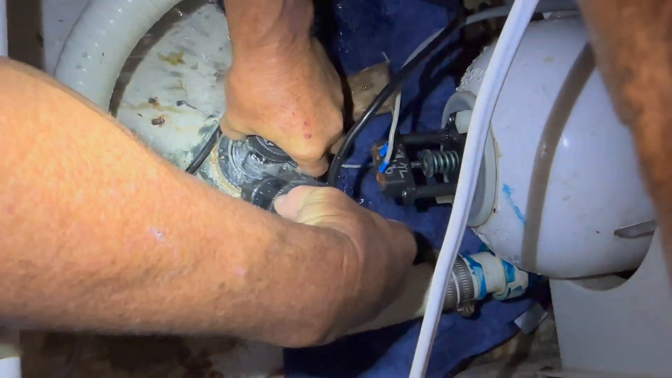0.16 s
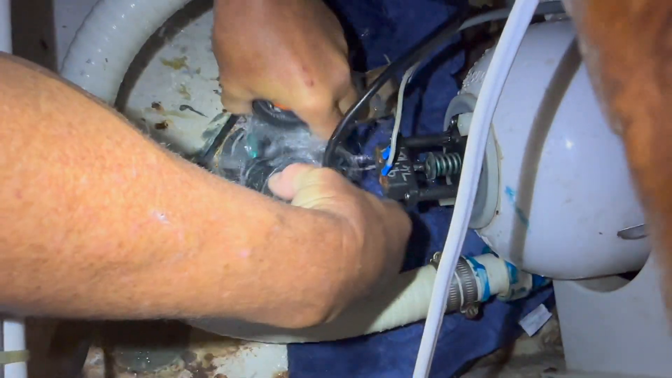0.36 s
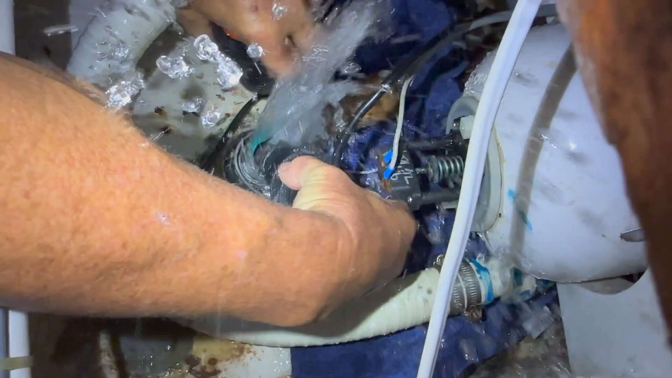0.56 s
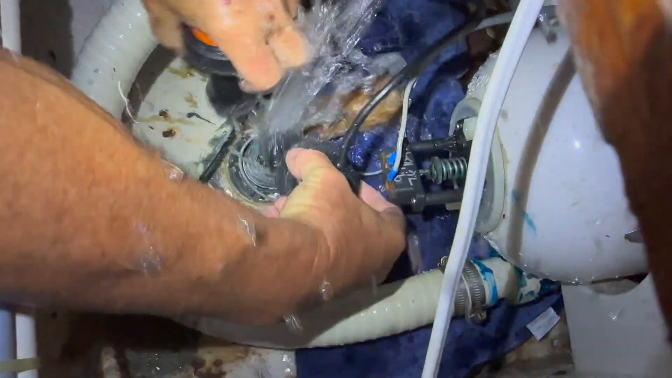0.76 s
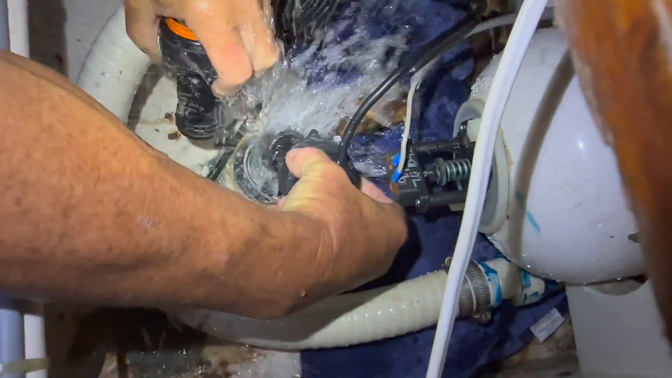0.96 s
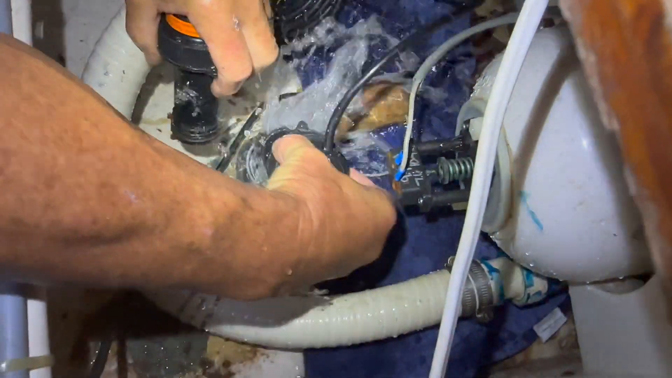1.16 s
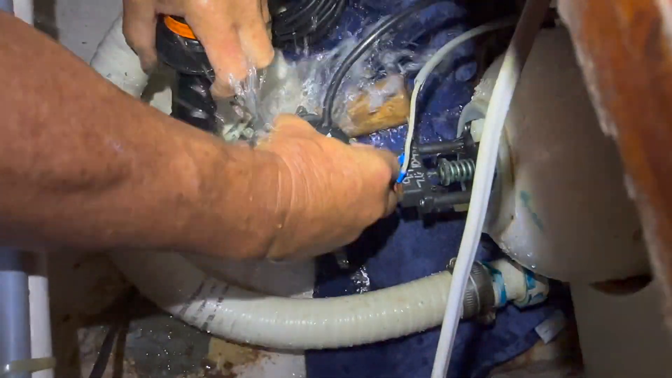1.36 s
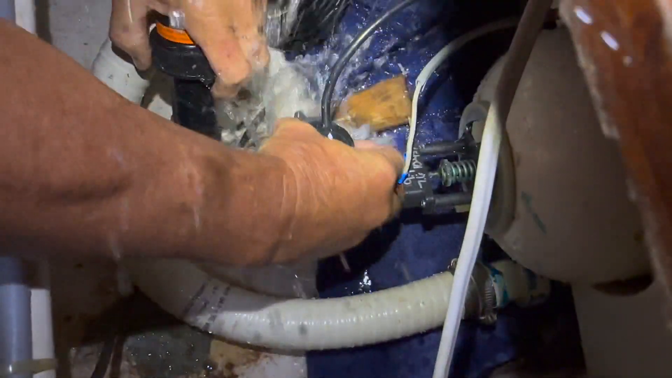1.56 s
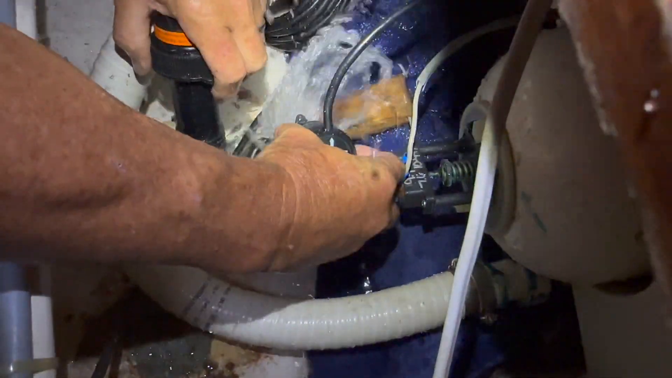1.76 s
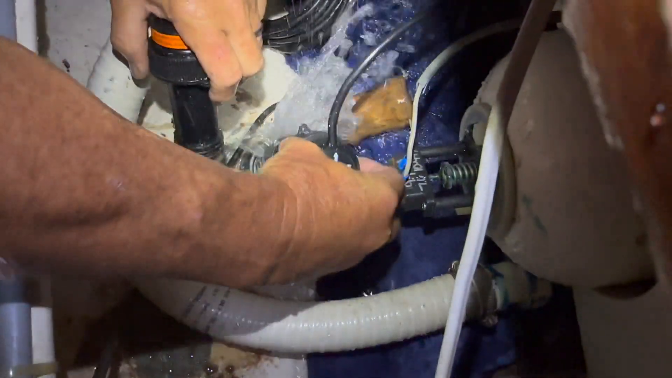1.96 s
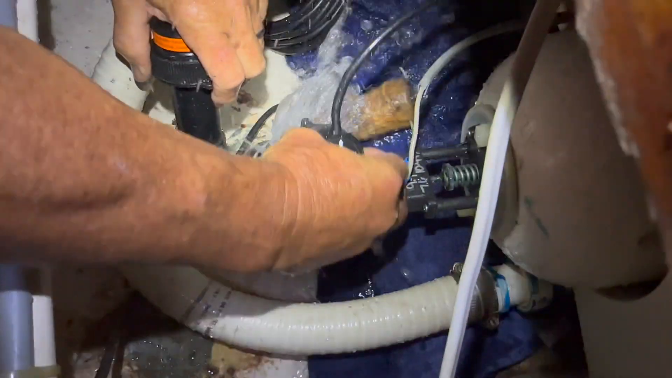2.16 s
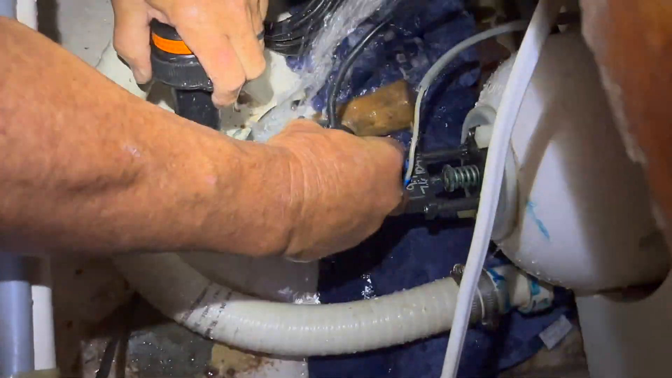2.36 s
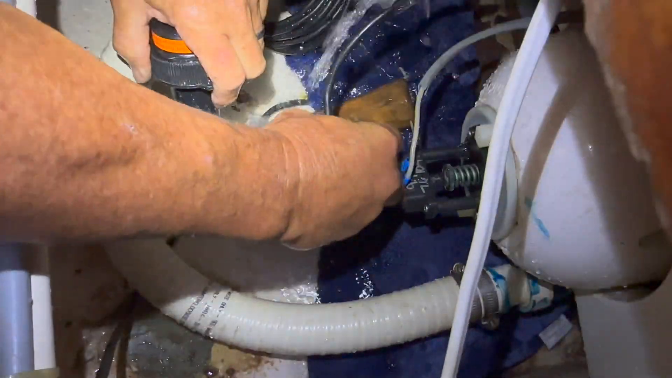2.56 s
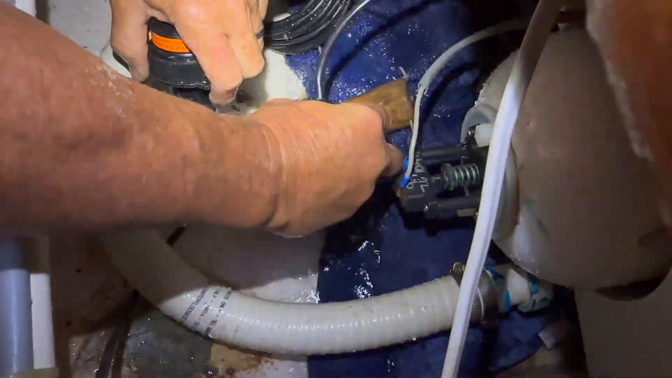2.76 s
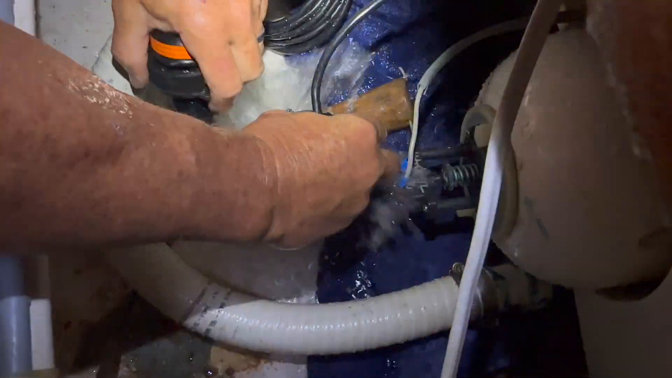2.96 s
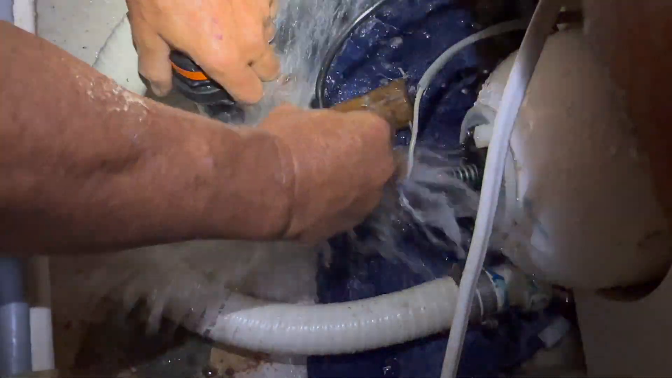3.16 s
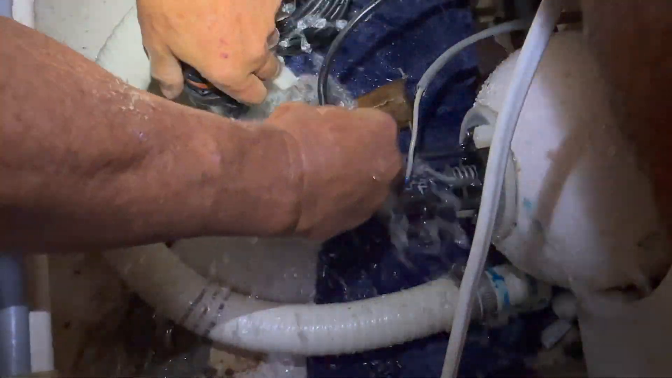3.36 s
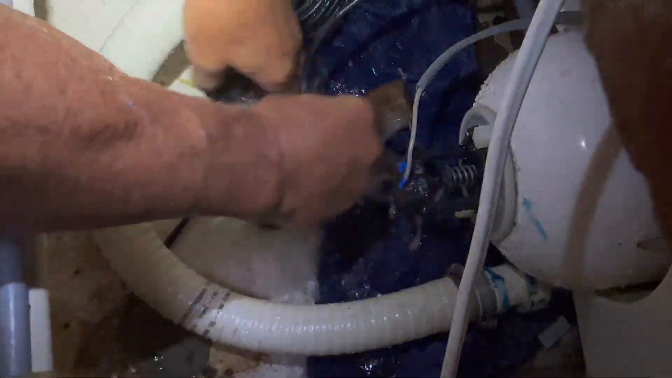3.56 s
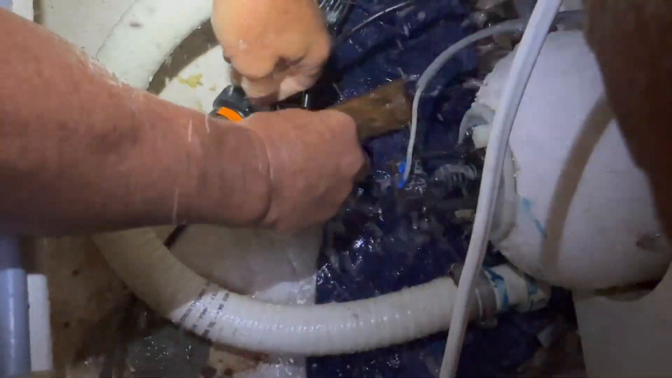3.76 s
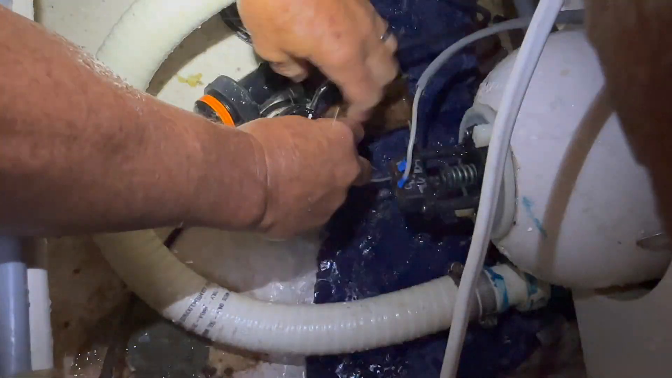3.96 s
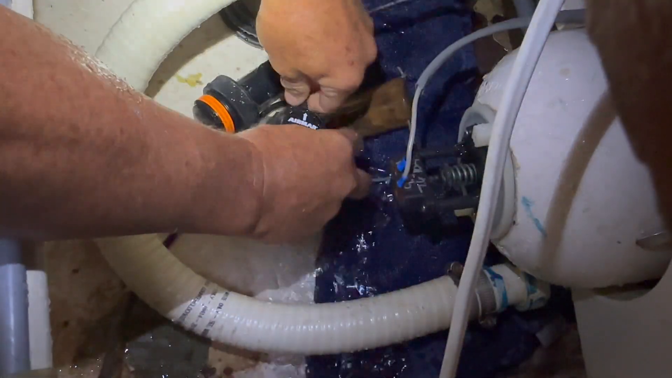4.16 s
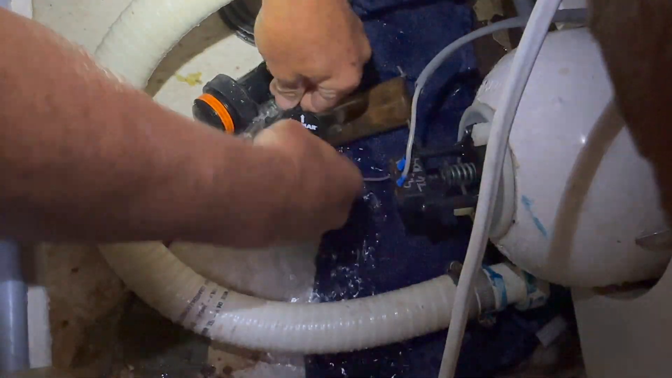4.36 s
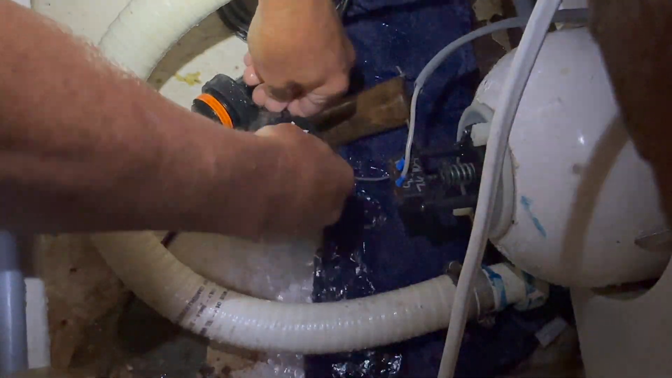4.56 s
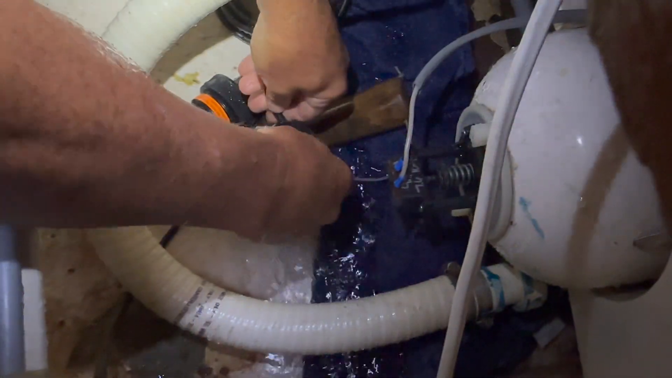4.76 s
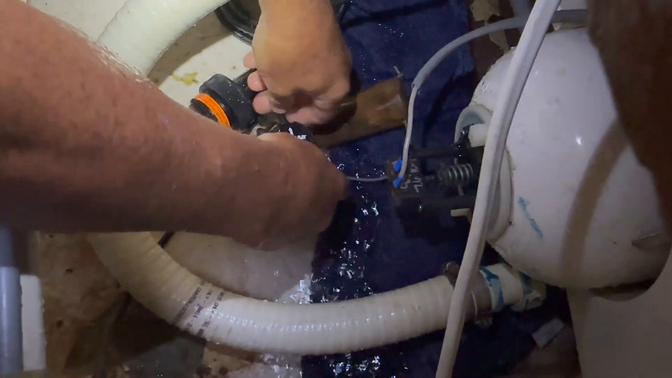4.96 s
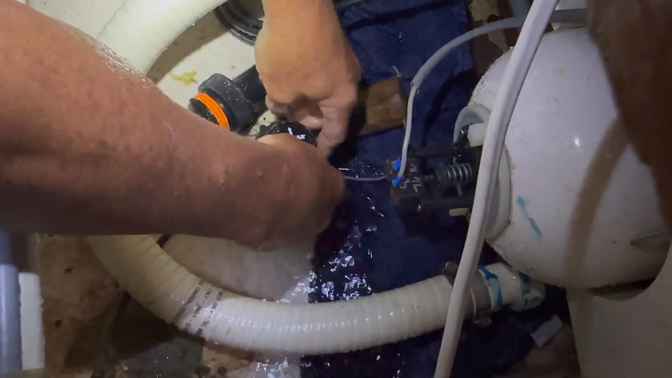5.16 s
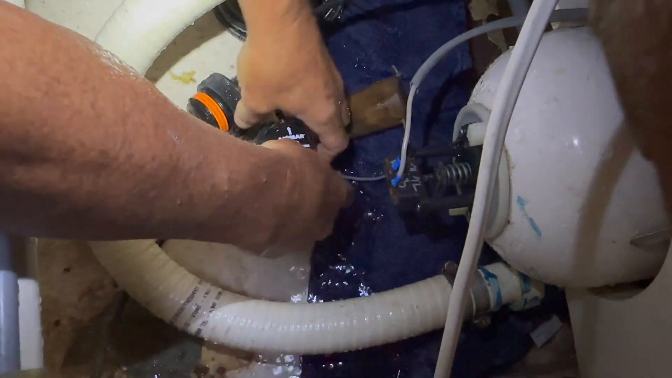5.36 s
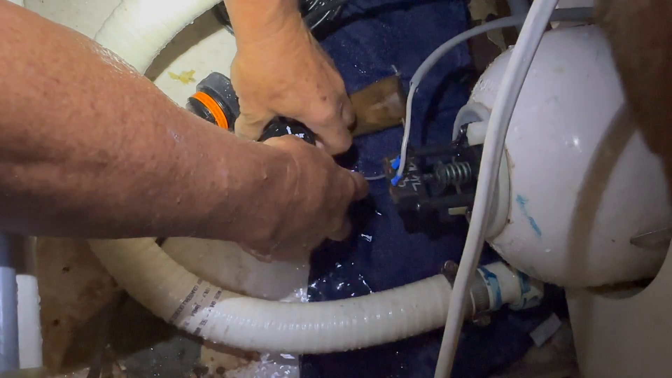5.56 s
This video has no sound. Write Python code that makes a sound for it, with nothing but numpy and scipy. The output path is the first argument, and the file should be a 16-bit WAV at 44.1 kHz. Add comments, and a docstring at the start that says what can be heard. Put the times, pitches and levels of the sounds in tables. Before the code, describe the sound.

A cramped, hard boat bilge, very close and wide in stereo, with short reflections. Seawater is already hissing as hands knock the fitting in a dull cluster at 0.1-0.2 s. Sloshing swells at 0.3, then the loudest event, a sharp double knock, watery slap and deep hull boom near 100 Hz, lands around 0.4. Bright spray gushes on, fizzing and bubbling, with a faint breathy whistle of the jet near 0.6-1.4, drop ticks, soft rubs and low bumps; clearer knocks come at 1.1, 2.2 and 2.5. Spray swells near 3.1. From 3.5 to 3.9 a hollow cap catches and grates, ringing briefly, with surges of splash at 3.55 and 3.7. From 4.0 the leak gurgles in uneven bubbly bursts. A rounded thump falls at 4.6, spray drops away by 4.8, another soft thump and gurgle come near 4.95, then faint trickling and isolated bubbles to about 5.6.

```python
"""In a boat's bilge, close to two microphone ports, seawater gushes through an open hull fitting from the start.
It sprays, sloshes and bubbles while hands knock and rub the fitting and the hull booms near 100 Hz.
From 3.5 s a hollow blanking cap grates into the fitting; from 4 s the leak gurgles under it, and by 4.8 s
the spray is faint. Water is noise and rising damped sines; solid parts are resonances struck or rubbed.
The ports hear the bass alike and the treble in opposite phase."""
import sys
import numpy as np
from scipy import signal
from scipy.fft import rfft, irfft, next_fast_len
from scipy.io import wavfile
from scipy.ndimage import uniform_filter1d

SR = 44100
rng = np.random.default_rng(int(sys.argv[2]) if len(sys.argv) > 2 else 0)


def transcribe(u):
    """Save the signal u as a 16-bit wav file named by the first command-line argument.

    u: samples, shape (n,) or (channels, n), limited to [-1, 1]; the rate is SR.
    q: integer samples, one column per channel.
    """
    v = np.clip(np.atleast_2d(u).T, -1, 1)
    q = np.round(v * 32767).astype(np.int16)
    wavfile.write(sys.argv[1], SR, q)


N = 247842  # samples

# Table levels are relative: each function adds its own trim in dB.


def amp(db):
    """Amplitude ratio of a level in dB."""
    return 10 ** (np.asarray(db) / 20)


def unit(x):
    """Scale to an RMS of one."""
    return x / np.sqrt(np.mean(x ** 2) + 1e-20)


def along(points, hz):
    """Read a curve of (frequency_hz, value) points on a log frequency axis."""
    point_hz, values = np.transpose(points)
    return np.interp(np.log(hz + 1), np.log(point_hz + 1), values)


def curves(rows):
    """One value per sample for each column after the time; -120 dB outside the table."""
    s, *columns = np.transpose(rows)
    return [np.interp(np.arange(N) / SR, s, column, -120, -120) for column in columns]


def milliseconds():
    """Clock in seconds for slow controls, one tick a millisecond."""
    return np.arange(0, N / SR + .001, .001)


def sampled(control):
    """A slow control interpolated to one value per sample."""
    return np.interp(np.arange(N) / SR, milliseconds(), control)


def swells(s, db, rise_s, t60):
    """Slow gain of each event, one a row, climbing then decaying in dB; also the time since each peak."""
    late = milliseconds() - np.c_[s]
    climb = -late / np.maximum(rise_s, .01)  # rise_s and t60 are each the time for 60 dB
    decay = late / np.maximum(np.c_[t60], .01)
    return amp(np.c_[db] - 60 * np.maximum(climb, decay)), late


def filtered(x, response):
    """Multiply the spectrum by a complex response of frequency."""
    m = next_fast_len(N + SR // 2)
    return irfft(rfft(x, m) * response(np.fft.rfftfreq(m, 1 / SR)), m)[..., :N]


def coloured(x, spectrum):
    """Shape the spectrum by a dB curve, then scale to an RMS of one."""
    return unit(filtered(x, lambda hz: amp(along(spectrum, hz))))


def resonant(x, modes):
    """Pass through parallel causal resonances of alternating sign."""
    def response(f):
        total = 0
        for k, (centre, width, db) in enumerate(modes):
            band = 1j * f * width
            total = total + (-1) ** k * amp(db) * band / (centre * centre - f * f + band)
        return total
    return filtered(x, response)


def near(hz, centre_hz, spread):
    """Weight of a mode by its distance in log pitch from where the part is excited."""
    return np.exp(-.5 * (np.log(hz / np.maximum(centre_hz, 1)) / spread) ** 2)


def patchy(depth_db):
    """Noise with patches of random gain in time and frequency."""
    z = signal.stft(rng.standard_normal(N), nperseg=256)[2]
    field = uniform_filter1d(rng.standard_normal(z.shape), 5, 0)
    field = uniform_filter1d(field, 6, 1)
    return signal.istft(z * amp(depth_db * unit(field)), nperseg=256)[1][:N]


def droplets(count, centre_hz, spread, cycles, size_db):
    """Random short bubbles, each a damped sine whose pitch rises."""
    draw = rng.random((count, 2))
    hz = np.clip(centre_hz * np.exp(spread * rng.standard_normal((count, 1))), 300, SR / 3)
    step = np.arange(350)
    turns = hz * step / SR
    # positive size_db: a few stand out loud; negative: a few are much fainter
    size = amp(-size_db * np.log(np.maximum(draw[:, 1:], .02)))
    fade = np.exp(-turns / cycles) * (1 - np.exp(-turns))
    wave = size * fade * np.sin(2 * np.pi * turns * (1 + 0.048 * turns / cycles))
    where = (draw[:, :1] * N).astype(int) + step
    return unit(np.bincount(where.ravel(), wave.ravel(), N + len(step))[:N])


# Decay of the enclosed space: frequency_hz [Hz], t60_s [s]
BILGE_DECAY = [(200, 0.23), (2000, 0.12), (10000, 0.2)]


def bilge(x):
    """The small hard bilge answers with two noise tails, each frequency dying at its own speed."""
    hz, t, z = signal.stft(rng.standard_normal((2, SR // 3)), SR, nperseg=256)
    fade = amp(-60 * t / along(BILGE_DECAY, hz)[:, None])
    tail = signal.istft(z * fade, SR, nperseg=256)[1]
    return signal.fftconvolve(x[None], tail / np.linalg.norm(tail[0]), axes=1)[:, :N]


# Sea against the hull: frequency_hz [Hz], level_db [dB per Hz]
RUMBLE_SPECTRUM = [(12, -48), (35, -3.5), (103, 0.5), (167, -16), (282, -11), (359, -4.5), (600, -13),
                   (780, -7.5), (1320, -120)]
RUMBLE_DB = -54.5


def rumble():
    """The sea against the hull is steady noise weighted to the bass."""
    return amp(RUMBLE_DB) * coloured(rng.standard_normal(N), RUMBLE_SPECTRUM)


# Weight landing on the hull panel: peak_s [s], level_db [dB], pitch_hz [Hz],
# rise_s [s to climb 60 dB], t60_s [s]; rise and decay times have a 0.01 s floor
THUMPS = [(0.188, -22, 98.45, 0.83, 0.031), (0.302, -19.5, 100.1, 0.14, 1), (0.416, -8, 116, .03, 0.5),
          (0.46, -11.5, 105.5, 0.24, 0.076), (0.528, -31, 93.5, 0.3, 0.18), (0.58, -15, 99, 0.18, 0.051),
          (0.62, -32, 123, -0.65, 0.18), (0.72, -29, 93.7, 0.67, 0.52), (0.85, -41, 104.8, 0.15, 1),
          (1.0, -42, 106.1, 0.53, 0.41), (1.111, -29, 116.9, 0.47, 0.48), (1.283, -26.5, 98.3, -0.33, 0.37),
          (1.528, -32, 111, -0.25, 0.19), (1.66, -44.5, 92.9, 1.5, 0.43), (1.881, -44, 110.8, 0.56, 0.19),
          (1.989, -41, 110.7, 0.32, 0.069), (2.214, -25, 99, -0.08, 0.88), (2.3, -28.5, 91.4, -0.3, 0.34),
          (2.53, -25.5, 96.2, -1.56, 0.38), (2.789, -32.5, 120.2, 0.18, 0.22), (2.92, -53, 100.9, 0.54, 1),
          (3.13, -50.5, 113.2, 0, 0.69), (3.3, -45, 95.9, 0.5, 0.78), (3.373, -23.5, 114.9, 0.25, 0.24),
          (3.419, -29.5, 100, 0.47, 0.42), (3.551, -37, 118.7, -0.26, 0.46),
          (3.603, -15.5, 119.3, 0.11, 0.47), (3.655, -34, 107, 1, 0.2), (3.74, -27, 99.5, 0.04, 0.15),
          (3.929, -26.5, 123.3, 0.36, 0.32), (4.518, -25, 97.8, -0.08, 0.93),
          (4.618, -15, 114.7, -0.67, 0.26), (4.661, -33.5, 107.3, 0.44, 0.18), (4.839, -41.5, 114, 2, 0.2),
          (4.942, -22.5, 121.6, -0.46, 0.62), (5.249, -37.5, 108, -0.26, 0.7)]
# Hull panel resonances: centre_hz [Hz], width_hz [Hz], level_db [dB]
PANEL_MODES = [(67.2, 28, -8), (92.4, 44, -5), (123.75, 5.2, 2.5), (156, 127, -26)]
REST_HZ, SETTLE_S, MURMUR_DB = 89.5, 0.08, -16  # murmur level against the spray curve


def hull():
    """Thumps raise the loaded panel's pitch by their gain-weighted mean; it settles as its modes murmur."""
    s, db, hz, rise_s, t60 = np.transpose(THUMPS)
    gain, late = swells(s, db, np.c_[rise_s], t60)
    boom = sampled(gain.sum(axis=0)) + amp(curves(FLOW)[0] + MURMUR_DB)
    raised_hz = np.c_[hz - REST_HZ] * np.exp(-np.maximum(late, 0) / SETTLE_S)
    lift_hz = sampled((gain * raised_hz).sum(axis=0)) / boom
    # water loading unsettles the pitch
    shake_hz = 3 * unit(uniform_filter1d(rng.standard_normal(N), size=900))
    turns = 2 * np.pi * np.cumsum(REST_HZ + shake_hz + lift_hz) / SR
    # the panel swings unevenly, which adds the octave
    tone = np.sqrt(2) * (np.sin(turns) + amp(-13) * np.cos(2 * turns))
    murmur = unit(resonant(rng.standard_normal(N), PANEL_MODES))
    return boom * (0.35 * tone + 0.32 * murmur)


# Hands sliding on the fitting: peak_s [s], level_db [dB], centre_hz [Hz]
STROKES = [(0.141, -24.5, 429), (0.31, -39, 196), (0.38, -71, 325), (0.414, -20.5, 344), (0.45, -30.5, 183),
           (0.61, -29, 230), (0.868, -35, 280), (1.05, -45, 203.5), (1.25, -39.5, 294), (1.31, -43.5, 180),
           (1.532, -38, 181), (1.618, -37, 229), (2.236, -35.5, 229.7), (2.3, -34, 251), (2.37, -48, 184),
           (2.53, -41, 310), (2.943, -52, 294.5), (3.371, -45, 181.8), (3.47, -43.5, 500),
           (3.54, -29.5, 272), (3.58, -30, 403), (3.66, -34, 176), (3.707, -33.5, 384), (3.9, -32.5, 271),
           (3.938, -49, 354), (4.52, -41, 247), (4.57, -54, 220), (4.626, -24, 204.7), (4.95, -43.5, 249.1),
           (5.199, -53.5, 200)]
# Fitting and bilge floor resonances: centre_hz [Hz], width_hz [Hz], level_db [dB]
BODY_MODES = [(181, 29, 4), (224, 39, 2), (280, 28, -2.5), (347.6, 31, 3.5), (472.5, 49, 1.5),
              (575, 39, -4), (687, 71, -2.5), (895, 200, -1)]
STROKE_RISE_S, STROKE_T60_S = 0.24, 0.11  # each for 60 dB
GRIP_DB, GRIP_HZ = -20, 270  # the held fitting shakes with the spray


def rubs():
    """Hands sliding on the fitting drive its modes near the pitch of the contact."""
    s, db, centre_hz = np.transpose(STROKES)
    gain = swells(s, db, STROKE_RISE_S, STROKE_T60_S)[0]
    grip = amp(curves(FLOW)[0] + GRIP_DB)
    rub = amp(20.5) * patchy(depth_db=4.5)
    out = np.zeros(N)
    for mode in BODY_MODES:
        hz = mode[0]
        drive = sampled(near(hz, centre_hz, 0.58) @ gain) + near(hz, GRIP_HZ, 0.31) * grip
        soft = resonant(rub * drive, [(hz, .8 * hz, 0)])  # a soft contact holds little treble
        out += resonant(soft, [mode])
    return out


# Blows on the fitting: start_s [s], body_level_db [dB], body_centre_hz [Hz],
# hand_damping_t60_s [s], crack_level_db [dB], crack_t60_s [s]
KNOCKS = [(0.106, -0.5, 520, 0.052, -55, 0.033), (0.117, -4.5, 524, 0.034, -33, 0.028),
          (0.127, -19, 470, 0.062, -40, 0.04), (0.141, -23, 393, 0.081, -35, 0.21),
          (0.166, -10, 250, 0.061, -50, 0.034), (0.182, -13.5, 424, 0.032, -32, 0.026),
          (0.319, -18.5, 423, .08, -37, .04), (0.376, -24, 400, 0.054, -22.5, 0.04),
          (0.394, 0, 730, 0.069, -10.5, 0.025), (0.397, -5.5, 486, 0.089, -7, 0.016),
          (0.41, -12, 209, 0.33, -38, 0.042), (0.498, -28, 340, .3, -43, 0.021),
          (0.563, -23, 624, .3, -31, 0.094), (0.581, -32, 350, .3, -31, 0.023),
          (0.599, -24, 310, .3, -27.5, 0.061), (0.612, -28, 190, .3, -32, 0.035),
          (0.635, -30.5, 503, .3, -39, 0.064), (0.836, -18.5, 281, 0.64, -29, 0.059),
          (1.097, -23.5, 425, .3, -27.5, 0.053), (1.117, -22.5, 331, 0.25, -49, 0.028),
          (1.141, -24, 240.3, 0.27, -36, 0.031), (1.265, -21.5, 395, 0.27, -40, 0.045),
          (1.282, -23, 182.4, 0.36, -45, 0.04), (1.503, -39, 353, .3, -29, 0.073),
          (1.581, -22, 283, 0.27, -33.5, 0.13), (2.092, -37.5, 274, .3, -34, 0.028),
          (2.203, -9.5, 307.4, 0.084, -31, 0.17), (2.213, -14, 335.5, 0.19, -30, 0.095),
          (2.222, -24, 230.4, 0.27, -49, .05), (2.506, -23, 335.2, 0.18, -26, 0.083),
          (2.524, -22, 297.3, 0.16, -53, 0.05), (3.322, -28.5, 342.9, .3, -29.5, 0.19),
          (3.486, -20.5, 477.8, .2, -11, 0.047), (3.508, -20, 190.5, 0.17, -26.5, 0.077),
          (3.582, -26, 384, .3, -18.5, 0.027), (3.672, -38, 180.7, .3, -16, 0.05),
          (3.714, -22, 590, .2, -26.5, 0.018), (3.803, -32, 537, 0.23, -28, 0.078),
          (3.863, -22, 382, 0.19, -22.5, 0.036), (3.902, -30, 187.5, .3, -18.5, 0.035),
          (4.294, -46, 347.6, 0.31, -29, 0.031), (4.488, -30.5, 376.6, 0.39, -36, 0.11),
          (4.592, -29, 252, 0.17, -39, 0.019), (4.6, -21.5, 333, 0.23, -42, 0.036),
          (4.616, -19.5, 200, .3, -32, 0.018), (4.643, -30, 185, 0.27, -56, 0.04),
          (4.667, -24.5, 197, .3, -59, 0.031), (4.922, -30, 422, .2, -31, 0.036),
          (4.94, -31, 230, 0.27, -43, 0.05), (5.237, -36, 356, .2, -44, 0.026),
          (5.513, -34.5, 446, .1, -49, 0.025)]


def knocks():
    """Each blow rings the modes near its own pitch, at new strengths, after a soft rise."""
    out, t = np.zeros(N + SR), np.arange(SR // 6) / SR
    hz, width, db = np.transpose(BODY_MODES)[:, :, None]
    ring = np.exp(-np.pi * width * t) * (1 - np.exp(-t / 0.0018)) ** 2
    chance = rng.standard_normal((len(KNOCKS), 2, len(BODY_MODES), 1))
    for (s, knock_db, centre_hz, held_t60, *_), (strength, phase) in zip(KNOCKS, chance):
        weight = amp(db + 0.72 * strength) * near(hz, centre_hz, 0.22)
        modes = weight * ring * np.sin(2 * np.pi * hz * t + 0.6 * phase)
        damping = amp(knock_db + 5.5 - 60 * t / max(held_t60, .01))
        out[round(s * SR):][:len(t)] += damping * modes.sum(axis=0) / np.linalg.norm(weight)
    return out[:N]


# Colour of the cracks: frequency_hz [Hz], level_db [dB per Hz]
CRACK_SPECTRUM = [(300, 2), (750, 12), (1300, -7), (2000, 3), (3400, 6), (5000, 0.5), (6500, 3.5),
                  (10000, -1.5), (16000, 0)]


def cracks():
    """Each knock starts with a splashy crack of decaying noise."""
    crack, t = np.zeros(N + SR), np.arange(SR // 3) / SR
    for s, *_, db, t60 in KNOCKS:
        fade = amp(db + 2.5 - 60 * t / max(t60, .005))
        crack[round(s * SR):][:len(t)] += fade * rng.standard_normal(len(t))
    norm = np.sqrt(np.mean(amp(2 * along(CRACK_SPECTRUM, np.arange(SR // 2)))))
    return filtered(crack[:N], lambda hz: amp(along(CRACK_SPECTRUM, hz)) / norm)


# The cap grating in the fitting: peak_s [s], level_db [dB], t60_s [s], centre_hz [Hz]
GRINDS = [(3.486, -4.5, 0.15, 2400), (3.505, -20.5, 0.11, 1290), (3.541, -15.5, 0.29, 1700),
          (3.553, -30, 0.13, 560), (3.579, -24, 0.15, 500), (3.64, -23, 0.12, 1350),
          (3.675, -16, 0.15, 2200), (3.689, -12.5, 0.1, 1700), (3.717, -11, 0.11, 1290),
          (3.806, -43, 0.064, 1390), (3.865, -16, 0.074, 900), (3.9, -12, 0.065, 1500),
          (3.918, -24.5, 0.19, 800)]
# Hollow blanking cap resonances: centre_hz [Hz], width_hz [Hz, at least 12], level_db [dB]
CAP_MODES = [(370, 21, 2), (452, 27, -4), (556.2, 7.2, 7), (730, 15, -3), (974, 71, -15.5), (1430, 34, -13),
             (1574, 42, -6.5), (1714, 22, -10), (1814, 71, -8.5), (2014, 44, -12.5), (2340, 91, -15),
             (2620, 68, -12), (2970, 110, -10), (3150, 74, -9.5)]
GRIND_RISE_S = 0.015  # time to climb 60 dB
STRIKE_DB = 32  # impulse of the catch at each peak, added to the table level


def cap():
    """Each contact catches once and grates, driving the cap's modes near its pitch; they ring on briefly."""
    s, db, t60, centre_hz = np.transpose(GRINDS)
    gain = swells(s, db, GRIND_RISE_S, t60)[0]
    grit = amp(13) * patchy(depth_db=4)
    out = np.zeros(N)
    for hz, width, mode_db in CAP_MODES:
        weight = near(hz, centre_hz, 0.86)
        grating = grit * sampled(weight @ gain)
        catches = np.bincount((s * SR).astype(int), weight * amp(db + STRIKE_DB), N)
        out += resonant(grating + catches, [(hz, max(width, 12), mode_db)])
    return out


# The leak gurgling under the cap: time_s [s], level_db [dB]
TRICKLE = [(3.95, -69), (4.0, -43.5), (4.13, -46), (4.26, -49), (4.35, -53.5), (4.44, -42.5), (4.55, -58),
           (4.62, -70), (4.69, -65), (4.74, -76), (4.86, -77), (4.9, -74), (4.98, -44.5), (5.05, -56),
           (5.09, -57.5), (5.15, -66), (5.24, -64), (5.35, -58), (5.42, -63), (5.5, -53), (5.62, -73.5)]
# Air trapped round the cap: centre_hz [Hz], width_hz [Hz], level_db [dB]
POCKET_MODES = [(1275, 110, -2), (1618, 24, -1.5), (1966, 130, 3.5), (2570, 110, 6.5)]


def trickle():
    """Uneven bubbling rings the air pockets."""
    churn = droplets(count=1500, centre_hz=1669, spread=0.424, cycles=2.5, size_db=2.0)
    churn = churn + 0.5 * patchy(depth_db=6.0)
    return amp(curves(TRICKLE)[0]) * unit(resonant(churn, POCKET_MODES))


# Drops striking hard surfaces: start_s [s], level_db [dB]
SPLATS = [(0.269, -18.5), (0.365, -15), (0.75, -25), (1.195, -17), (1.557, -21.5), (1.979, -12.5),
          (2.2773, -18.5), (3.281, -21.5), (4.0706, -22), (4.405, -27), (4.5224, -20), (4.5915, -20),
          (4.639, -22.5), (4.759, -35), (4.777, -28.5), (4.837, -32), (4.9727, -26.5), (5.019, -28.5),
          (5.151, -42)]
SPLAT_T60_S = 0.033


def splats():
    """Drops striking hard surfaces are short ticks of noise, high-passed to sound bright."""
    out, t = np.zeros(N + SR), np.arange(SR // 20) / SR
    for s, db in SPLATS:
        fade = amp(db + 2.5 - 60 * t / SPLAT_T60_S)
        out[round(s * SR):][:len(t)] += fade * rng.standard_normal(len(t))
    return filtered(out[:N], lambda f: (1j * f / 4500 / (1 + 1j * f / 4500)) ** 2)


# Large single bubbles: start_s [s], level_db [dB], pitch_hz [Hz at the start], t60_s [s]
BUBBLES = [(0.3166, -17, 867, .04), (0.749, -22, 4070, 0.034), (0.829, -20.5, 2910, 0.024),
           (0.9372, -16.5, 2670, 0.024), (1.4696, -29, 3600, 0.044), (1.5547, -26.5, 2530, 0.042),
           (1.8182, -30, 3040, 0.059), (2.09, -17, 3590, .03), (2.1824, -21.5, 724, 0.065),
           (2.307, -23, 1970, 0.028), (2.368, -35.5, 2000, 0.12), (2.51, -25.5, 1374, 0.076),
           (2.633, -28.5, 2830, 0.066), (2.6546, -26, 3830, .04), (2.7377, -29, 1010, .05),
           (2.7806, -31, 1086, .05), (2.804, -28, 2170, 0.059), (2.8449, -26.5, 1193, 0.044),
           (3.259, -27, 2590, .04), (3.3015, -23, 3600, .04), (3.4296, -32.5, 1640, .04),
           (3.4457, -31, 1690, 0.055), (3.999, -30.5, 1230, 0.059), (4.01, -30, 3040, .12),
           (4.028, -31, 2080, .05), (4.073, -25, 2420, 0.034), (4.075, -27, 1206, .03),
           (4.09, -23, 3710, 0.033), (4.1285, -32.5, 2730, 0.049), (4.1747, -27.5, 1270, 0.047),
           (4.205, -26, 4340, .03), (4.2253, -27, 3530, .03), (4.25, -25, 1293, 0.054),
           (4.253, -23.5, 1914, 0.041), (4.2958, -30, 1230, 0.061), (4.366, -38, 1300, 0.068),
           (4.4085, -41, 2330, 0.023), (4.4298, -22.5, 1288, 0.044), (4.446, -25, 4050, .06),
           (4.454, -34, 1640, .06), (4.5003, -35, 2560, .04), (4.544, -37, 1650, 0.025),
           (4.565, -32, 2000, 0.025), (4.5897, -25, 1020, .03), (4.607, -33, 1910, .04),
           (4.6124, -19, 1054, .03), (4.663, -23.5, 1600, 0.046), (4.669, -24, 1960, 0.03),
           (4.757, -35, 1895, 0.014), (4.782, -38.5, 970, 0.052), (4.79, -53, 2210, 0.033),
           (4.885, -39, 1273, 0.094), (4.911, -28, 3100, .05), (4.927, -32.5, 4050, 0.031),
           (4.959, -39, 1330, .04), (4.9711, -30, 1610, 0.1), (4.985, -34, 2220, .04),
           (5.035, -44, 2710, 0.038), (5.066, -31, 3660, 0.04), (5.0788, -39.5, 1603, 0.11),
           (5.2057, -42, 2000, .06), (5.2427, -39.5, 2110, 0.057), (5.333, -42.5, 2360, 0.052),
           (5.358, -44, 1373, .1), (5.475, -47, 1690, 0.084)]
SHED_DB, SHED_S = -20.5, 0.05  # weaker bubbles follow within SHED_S


def bubbles():
    """Each large bubble rises slightly in pitch, roughened by churn, and sheds five weaker ones of like pitch."""
    out, t = np.zeros(N + SR), np.arange(SR // 12) / SR
    churn = uniform_filter1d(rng.standard_normal((len(BUBBLES), len(t))), size=130, axis=1)
    shed = rng.random((len(BUBBLES), 5, 2))
    for (s, db, hz, t60), rough, small in zip(BUBBLES, unit(churn), shed):
        fade = amp(db - 60 * t / max(t60, .01)) * (1 - np.exp(-t / 0.0012))
        fade = fade * (1 + 0.48 * rough)
        turns = 2 * np.pi * hz * t * (1 + 0.28 * t)
        out[round(s * SR):][:len(t)] += fade * np.sin(turns)
        for late, high in small:
            weaker = amp(SHED_DB) * fade * np.sin(turns * (0.93 + 0.219 * high))
            out[round((s + SHED_S * late) * SR):][:len(t)] += weaker
    return out[:N]


# Course of the water: time_s [s], spray_level_db [dB], pool_level_db [dB]
FLOW = [(0.0, -34.5, -40), (0.09, -32, -36), (0.21, -37, -62), (0.3, -28, -26.5), (0.41, -31, -27.5),
        (0.48, -36.5, -47), (0.86, -29.5, -43.5), (1.1, -33.5, -45.5), (1.3, -31.5, -39.5),
        (1.72, -35.5, -40), (1.8, -32, -39.5), (1.92, -32.5, -41), (2.16, -34.5, -40.5), (2.32, -33, -38),
        (2.43, -37, -54), (2.69, -36.5, -56), (2.76, -34.5, -37.5), (3.0, -31, -49.5), (3.1, -28, -38),
        (3.41, -35.5, -50), (3.55, -27, -25.5), (3.63, -32.5, -32.5), (3.7, -24, -19), (3.76, -38, -70),
        (3.85, -34, -52), (4.08, -36, -53), (4.45, -38.5, -50.5), (4.66, -39, -37), (4.74, -50.5, -58),
        (4.85, -56, -68), (4.91, -49.5, -69), (4.93, -48, -40), (5.08, -50.5, -59), (5.15, -59, -54),
        (5.25, -48.5, -48), (5.4, -58, -44), (5.47, -51.5, -55), (5.62, -53, -51.5)]
# Colour of the spray: frequency_hz [Hz], level_db [dB per Hz]
SPRAY_SPECTRUM = [(900, -20), (1800, -7), (2500, -4.5), (3800, 1), (5000, -2.5), (6200, 3), (8500, 3.5),
                  (11000, -1.5), (14000, -1.5), (16000, 4)]
# Colour of the pool's slosh: frequency_hz [Hz], level_db [dB per Hz]
SLOSH_SPECTRUM = [(300, -75), (600, 8.5), (850, 10), (1100, 3.5), (1400, 8), (1900, -3), (2400, -11),
                  (3500, -13.5)]
# Water thrown against the bilge: peak_s [s], level_db [dB], t60_s [s]
SLAPS = [(0.113, -28, 0.4), (0.397, -5, 0.11), (0.5, -28, 0.11), (1.1, -15.5, 0.18), (1.266, -30, 0.25),
         (2.204, -23.5, 0.12), (2.31, -32.5, 0.083), (2.509, -18, 0.11), (2.66, -45, 0.17),
         (3.098, -50, 0.46), (3.43, -45, .3), (3.49, -36, 0.37), (3.674, -35, 0.11), (3.804, -24, 0.13),
         (3.864, -20.5, 0.1), (3.908, -25.5, 0.2), (4.259, -39.5, 0.12), (4.598, -24.5, 0.096),
         (4.925, -25, 0.081)]
SLAP_RISE_S = 0.018  # time to climb 60 dB
# The jet singing in the open bore: time_s [s], level_db [dB]
WHISTLE = [(0.55, -70), (0.576, -55), (1.052, -57), (1.124, -54), (1.206, -57), (1.272, -53), (1.394, -79),
           (1.45, -55)]
# Bore resonances: centre_hz [Hz], width_hz [Hz], level_db [dB]
BORE_MODES = [(1914, 98, 13), (2560, 440, 10)]


def water():
    """The jet breaks into spray and fizz and sings in the bore; the pool below sloshes and bubbles."""
    spray_db, pool_db = curves(FLOW)
    fizz = droplets(count=6000, centre_hz=5694, spread=0.611, cycles=5.3, size_db=-5)
    spray = coloured(patchy(depth_db=4.0) + 0.44 * fizz, SPRAY_SPECTRUM)
    gurgle = droplets(count=2200, centre_hz=1564, spread=0.406, cycles=9.3, size_db=2.0)
    # the gurgle's level is held below a ceiling
    pool = amp(np.minimum(pool_db, -42) - 13.0) * gurgle
    s, db, t60 = np.transpose(SLAPS)
    slaps = sampled(swells(s, db, SLAP_RISE_S, t60)[0].sum(axis=0))
    slosh = amp(-7.0) * (amp(pool_db) + slaps) * coloured(patchy(depth_db=5.0), SLOSH_SPECTRUM)
    sing = unit(resonant(resonant(rng.standard_normal(N), BORE_MODES), BORE_MODES))
    whistle = amp(curves(WHISTLE)[0] + 11.5) * sing
    return amp(spray_db + 3.5) * spray + slosh + pool + whistle


# Port difference against port sum, before the source levels: frequency_hz [Hz], ratio_db [dB]
APART = [(60, -41), (120, -33.5), (250, -16), (400, -8.5), (650, 5), (1200, -2), (2100, -13), (3300, 1.5),
         (4600, -0.5), (5800, -3), (7000, 2), (8500, 4), (9800, 10.5), (11500, 47.5), (13500, 33.5),
         (15000, 5.5), (16000, 21.5)]
# Phase turn of the port difference: frequency_hz [Hz], phase_rad [radians]
LAG = [(150, 0.76), (400, 4.5), (900, 1.6), (4000, 1.68), (10000, 1.34)]


def scene():
    """Port sum and port difference share the sound by frequency; spray from all round differs between the ports."""
    solid = bubbles() + splats() + hull() + rubs() + knocks() + cracks() + cap() + trickle() + rumble()
    ahead, around = water(), water()
    # the echo carries little below 160 Hz
    echo = filtered(bilge(solid + ahead), lambda hz: 1 / (1 + (160 / (hz + 1)) ** 4))

    def turn(hz):
        """Angle that splits the sound between sum and difference."""
        return np.arctan(amp(along(APART, hz)))

    mid = solid + ahead + amp(-9.5) * echo[0]
    mid = filtered(mid, lambda hz: np.cos(turn(hz)))
    side = 0.52 * solid + 0.42 * ahead + 0.28 * around + amp(-5.5) * echo[1]
    side = filtered(side, lambda hz: np.exp(1j * along(LAG, hz)) * np.sin(turn(hz)))
    return np.array([mid + side, mid - side])


CEILING, TOP_HZ = 0.88, 15950  # full-scale fraction, band limit in Hz


def record(dry):
    """The loudest peaks round off softly towards the ceiling; nothing above the band limit is kept."""
    rounded = dry / (1 + np.abs(dry / CEILING) ** 4) ** (1 / 4)
    return filtered(rounded, lambda hz: hz < TOP_HZ)


dry = scene()
out = record(dry)
transcribe(out)
```